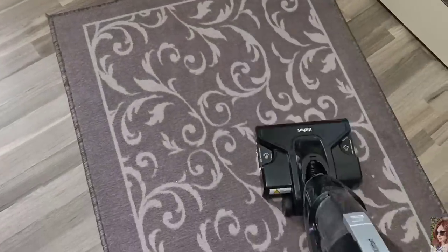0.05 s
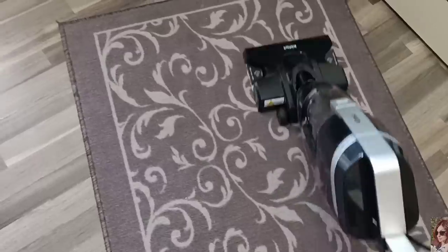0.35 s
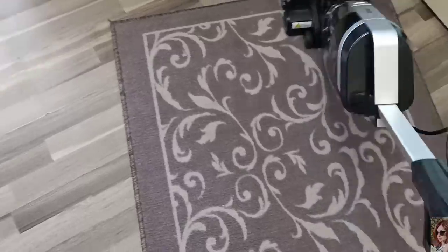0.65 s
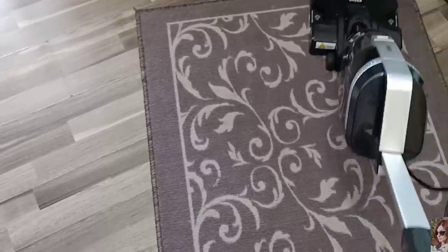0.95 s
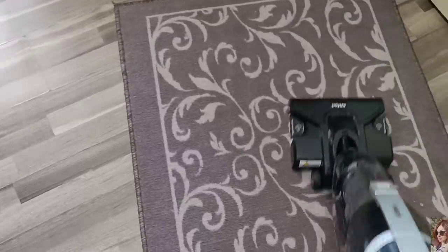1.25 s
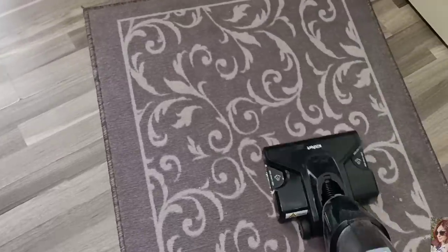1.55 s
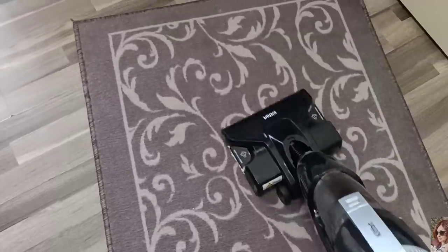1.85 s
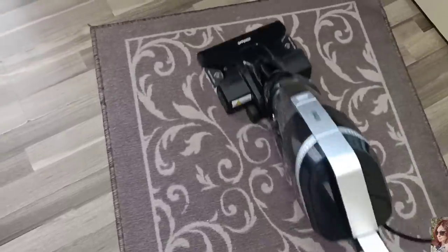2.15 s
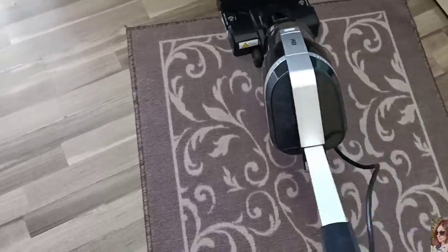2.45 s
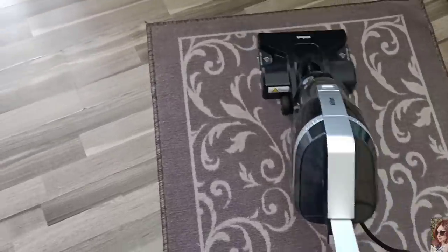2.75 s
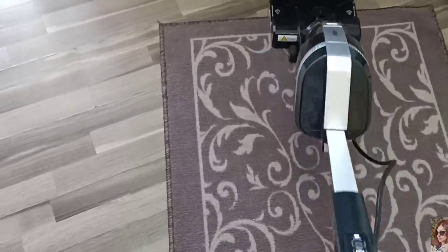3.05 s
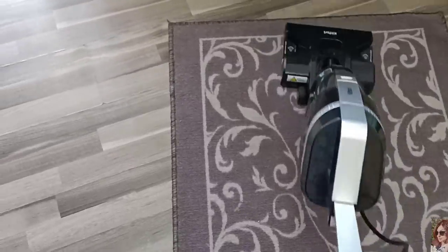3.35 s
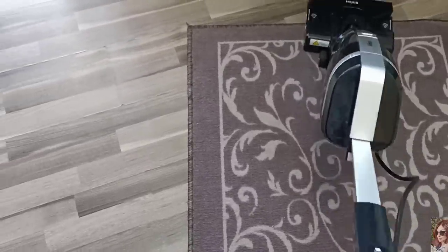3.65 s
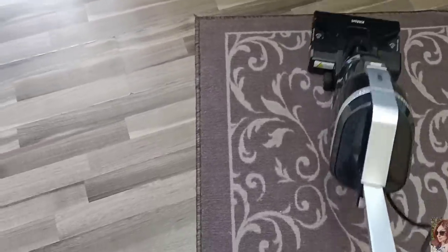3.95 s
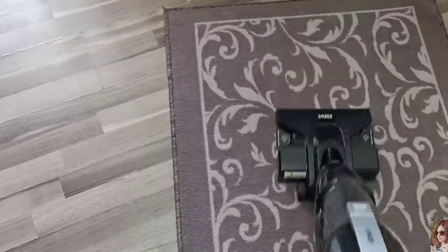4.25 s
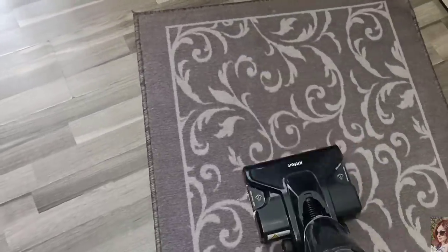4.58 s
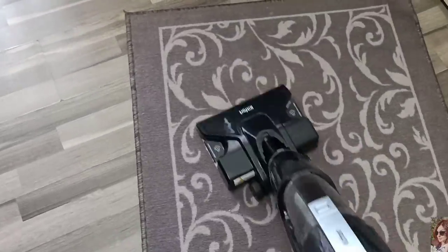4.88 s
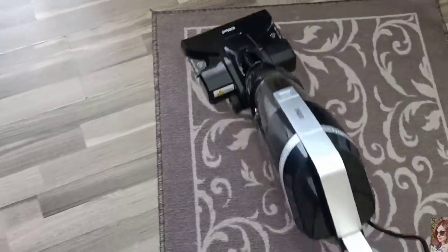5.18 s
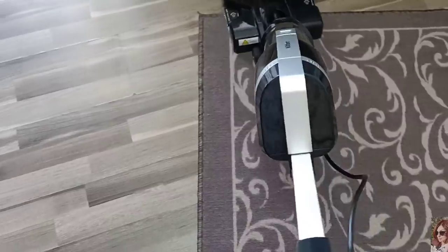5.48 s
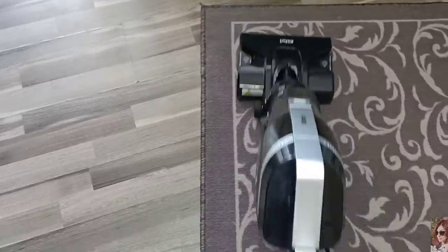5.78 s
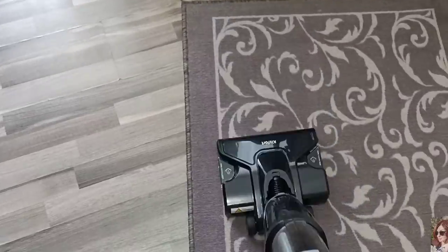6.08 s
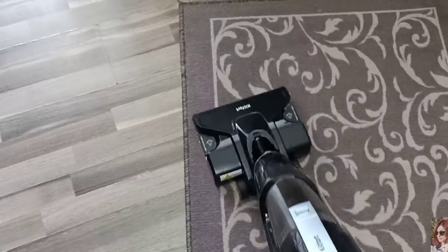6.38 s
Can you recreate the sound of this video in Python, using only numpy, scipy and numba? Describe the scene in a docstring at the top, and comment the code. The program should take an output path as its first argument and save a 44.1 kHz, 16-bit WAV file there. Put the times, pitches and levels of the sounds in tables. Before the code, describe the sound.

An upright vacuum cleaner runs throughout on a rug, with rushing air at the nozzle, a lower roar and a thin hiss. The rush swells and sinks as it is pushed back and forth. Grit whirls in the plastic dust cup with a dense, bright patter, while larger bits click sharply against the wall, hardest about a third of the way in and near the end. A phone microphone picks it up from about a metre away in a furnished room.

```python
"""Furnished room, phone microphone about a metre from an upright vacuum cleaner working a rug; mono.
From the start, air rushes at the nozzle, roars through the ducts and hisses from the vents, while
sucked-up grit whirls round the plastic dust cup in a dense patter. The rush swells and sinks as the
machine is pushed to and fro, with stray ticks of sand and soft thumps of microphone overload. Larger
bits knock on the cup wall, hardest just after 2 s and again from about 5 s; the patter peaks near 6 s."""
import sys
import numpy as np
from scipy import signal
from scipy.fft import rfft, irfft
from scipy.io import wavfile
from scipy.ndimage import uniform_filter1d, minimum_filter1d
from numba import njit

SR = 44100
rng = np.random.default_rng(int(sys.argv[2]) if len(sys.argv) > 2 else 0)


def put_to_file(sound):
    """Save the sound as 16-bit audio at rate SR, in the file named by the first command-line argument."""
    columns = np.atleast_2d(sound).T  # one column per channel
    safe = np.clip(columns, -1, 1)
    whole_steps = np.round(safe * 32767)
    wavfile.write(sys.argv[1], SR, whole_steps.astype(np.int16))


N = 287532
TIME = np.arange(N) / SR

# air rush at the nozzle, loud when drawn near and faint at arm's length: t/s, level/dB
NOZZLE_RUSH = [(0, -23), (0.28, -23.5), (0.55, -25.5), (0.92, -29.5), (1.32, -23.5), (1.6, -25.5),
               (1.85, -23), (2.25, -24.5), (2.5, -28), (2.9, -26), (3.25, -26.5), (3.55, -26),
               (3.95, -26.5), (4.45, -21.5), (4.7, -25), (5.07, -22.5), (5.4, -26.5), (5.8, -28.5),
               (6.27, -21), (6.52, -23)]
# flow of grit whirling in the cup: t/s, level/dB
GRIT_FLOW = [(0, -26.5), (0.3, -23.5), (0.56, -30), (0.7, -25), (0.79, -39), (0.91, -26.5), (1.09, -32),
             (1.2, -24.5), (1.8, -25), (2.06, -29.5), (2.52, -21.5), (2.94, -24.5), (3.18, -21),
             (3.45, -26), (3.97, -28.5), (4.14, -24), (4.26, -32), (4.7, -24.5), (5.04, -33), (5.17, -25),
             (5.36, -30), (5.62, -23.5), (5.97, -18.5), (6.22, -27.5), (6.52, -30)]
USUAL_FLOW_DB = -25.5
# spectrum of grit striking plastic: f/Hz, relative level/dB
GRIT_SPECTRUM = [(25, -18.5), (200, -26.5), (1200, -19), (2000, -12), (2800, -3), (3400, -0.5), (3850, 6),
                 (4400, 3.5), (5150, 2), (5700, 5.5), (6100, -0.5), (6600, -8), (7400, -15), (11000, -39)]
# spectrum of the vent hiss and the sand ticks: f/Hz, relative level/dB
HISS_SPECTRUM = [(1000, -43), (6000, -21), (8000, 4), (9500, 0), (11200, -2.5), (12400, 3.5), (13300, 8),
                 (14300, 7.5), (15700, 0)]


def nozzle(hollow_hz=2904, hz_per_db=16, width_hz=520.0, flutter_db=1.34):
    """Air rushes under the nozzle; its hollow resonance shifts as the gap to the rug changes."""
    # spectrum of the intake air: f/Hz, relative level/dB
    air_spectrum = [(200, -45.5), (1300, -16), (1900, -5.5), (2400, -1), (2900, -2.5), (3600, 2.5),
                    (4300, -2), (5100, -8), (5800, -9), (6800, -20.5), (8500, -31.5), (11000, -37.5),
                    (16000, -29)]
    air = colour(rng.standard_normal(N), air_spectrum)
    rush_db = curve(NOZZLE_RUSH)
    hollow = bandpass(air, hollow_hz + hz_per_db * (rush_db - rush_db.mean()), width_hz)
    return unit(air + hollow) * undb(rush_db + flutter_db * wander(90))


def grit(count=4600, spread_db=2.5, surge_db=0.94, bright_hz=5700.0, brighten=0.23):
    """Hundreds of grains a second, mostly small, strike the cup; a strong flow is louder and brighter."""
    when, weight = rng.random((count, 2)).T
    times = when * N / SR
    sizes = undb(spread_db * np.minimum(-np.log(1 - weight), 4))
    patter = colour(pulses(times, sizes), GRIT_SPECTRUM)
    patter += dust_cup(times, sizes, ring_db=-18, scatter_db=-22.5, scatter_s=0.007)
    flow_db = curve(GRIT_FLOW)
    treble = bandpass(patter, np.full(N, bright_hz), width_hz=1200.0)
    patter += (undb(brighten * (flow_db - USUAL_FLOW_DB)) - 1) * treble
    return unit(patter) * undb(flow_db + 0.1 + surge_db * wander(15))


def hard_bits(count=125, crowding=0.8, lesser_db=-8, crack_hz=4200, hz_per_db=69, spread_hz=350):
    """Time, level and pitch of each hit; in a faster whirl the lesser bits come oftener and harder."""
    # the largest bits hitting the cup wall: t/s, relative level/dB
    largest = [(0.1736, -6.5), (0.2235, -7), (0.5738, -4.5), (0.6518, -4), (1.0112, -6), (1.7357, -6),
               (1.8278, -6), (2.1031, -4), (2.2002, 1), (2.2832, -3), (2.3567, 0), (2.5616, -2),
               (2.5805, -10), (2.7229, -6), (2.7407, -6), (2.8991, -7), (2.9401, -7), (3.0668, -7),
               (3.2061, -12), (3.4497, -7), (3.4983, -5), (3.5279, -14), (3.6833, -7), (3.8396, -7.5),
               (4.3716, -6), (4.8968, -1), (5.0132, -4.5), (5.1824, -3), (5.1932, -1), (5.222, -8),
               (5.2683, -2), (5.4124, -5.5), (5.5332, -1), (5.5921, -7), (5.605, -5), (5.6232, -5),
               (5.635, -1), (5.8127, -3), (5.8809, -6), (6.0179, 0), (6.0667, -2), (6.1296, -2),
               (6.1691, -3), (6.193, -4), (6.3749, -7)]
    flow_db = curve(GRIT_FLOW) - USUAL_FLOW_DB
    passed = np.cumsum(undb(crowding * flow_db))
    shares = (np.arange(count) + 2 * rng.random(count)) % count / count
    times = np.interp(shares, passed / passed[-1], TIME)
    levels = lesser_db + 0.32 * np.interp(times, TIME, flow_db) + rng.standard_normal(count)
    times, levels = np.vstack([np.column_stack([times, levels]), largest]).T
    pitches = crack_hz + hz_per_db * np.interp(times, TIME, flow_db)  # faster whirl, brighter cracks
    return times, levels, pitches + spread_hz * rng.standard_normal(len(times))


def knocks(crack_db=-0.5, rise_s=0.00016, bounce_db=-9, bounce_s=0.004, ring_spread_db=3.0):
    """Each hard bit gives a crack a few cycles long, hops once and sets the cup ringing."""
    times, levels, pitches = hard_bits()
    sizes = undb(levels)
    phases, hops = rng.random((len(times), 2)).T
    t = np.arange(SR // 300) / SR
    envelope = t / rise_s * np.exp(1 - t / rise_s)
    cracks = np.zeros(N + len(t))
    for start, size, hz, phase in zip((times * SR).astype(int), sizes, pitches, phases):
        cracks[start:start + len(t)] += size * envelope * np.cos(2 * np.pi * (hz * t + phase))
    # the cracks sound dulled above about 6.5 kHz
    cracks = signal.sosfilt(signal.butter(6, 6500, fs=SR, output="sos"), cracks[:N])
    bounces = colour(pulses(times + bounce_s * hops, sizes), GRIT_SPECTRUM)
    strikes = sizes * undb(ring_spread_db * rng.standard_normal(len(times)))
    ringing = dust_cup(times, strikes, ring_db=-6.5, scatter_db=-11, scatter_s=0.0018)
    return undb(crack_db) * cracks + undb(bounce_db) * bounces + ringing


def dust_cup(times, sizes, ring_db, scatter_db, scatter_s, travel_s=0.0008):
    """The cup answers each impact with modes weighted by the place struck and a brief dense scatter."""
    # modes of the plastic cup: f/Hz, t60/s, relative level/dB
    cup_modes = [(2774, 0.029, -9), (3380, 0.0041, -11.5), (3750, 0.014, -1), (4034, 0.017, -5.5),
                 (4240, 0.015, -9.5), (4920, 0.021, -5), (5490, 0.012, -3), (5780, 0.013, 0),
                 (6140, 0.0095, -12), (7970, 0.013, -21)]
    places = rng.standard_normal((len(times), len(cup_modes))).T
    places /= np.linalg.norm(places, axis=0)
    # bending waves need a moment to go round the wall, so each mode starts a little late
    lags = travel_s * rng.random((len(times), len(cup_modes))).T
    modes = sum(undb(db) * ring(pulses(times + lag, sizes * place), hz, t60)
                for (hz, t60, db), place, lag in zip(cup_modes, places, lags))
    energy = decay(pulses(times, sizes ** 2), scatter_s / 2)
    scatter = colour(np.sqrt(energy) * rng.standard_normal(N), GRIT_SPECTRUM)
    return undb(ring_db) * modes + undb(scatter_db) * scatter


def exhaust(roar_db=-33.0, duct_db=1.0, vent_db=-45.6):
    """The fan's turbulent air roars, rings the ducts and leaves the vents as a thin, flickering hiss."""
    # resonances of the ducts and motor housing: f/Hz, width/Hz, relative level/dB
    duct_modes = [(287.3, 15.5, 3), (430, 33, -3), (712.4, 27, 4.5), (833, 59, 3), (1131, 38, 2),
                  (1245, 21, 1.5), (2092, 105, 2)]
    # those resonances at the microphone as the body swings and tilts: t/s, level/dB
    duct_facing = [(0, -38), (0.7, -40), (1.1, -37), (1.8, -40.5), (2.05, -40), (2.5, -40), (2.88, -38),
                   (3.15, -40.5), (3.6, -38), (3.85, -39.5), (4.22, -36.5), (4.72, -42), (4.95, -38),
                   (5.8, -39.5), (6.05, -42.5), (6.52, -39)]
    # spectrum of the roar: f/Hz, relative level/dB
    roar_spectrum = [(20, -21), (100, -16.5), (150, -36), (220, -8.5), (350, -0.5), (570, -2.5), (720, 5),
                     (1000, 3.5), (1350, 2), (1900, 7), (3000, -1.5), (6000, -4.5), (10000, -32.5),
                     (16000, -39)]
    # brief swells of the hiss: t/s, half length/s, rise/dB
    hiss_swells = [(1.68, 0.2, 4), (3.82, 0.05, 2), (4.14, 0.045, 5)]
    ducts = sum(undb(db) * width * ring(rng.standard_normal(N), hz, np.log(1000) / (np.pi * width))
                for hz, width, db in duct_modes)
    roar = unit(colour(rng.standard_normal(N), roar_spectrum))
    hiss = unit(colour(rng.standard_normal(N), HISS_SPECTRUM))
    facing_db, rush_db = curve(duct_facing), curve(NOZZLE_RUSH)
    turn_db = facing_db - facing_db.mean()
    roar *= undb(roar_db + 0.12 * (rush_db - rush_db.mean()) + 0.41 * turn_db)
    body = roar + unit(ducts) * undb(facing_db + duct_db)
    swell_db = sum(db * bump(at, half_s) for at, half_s, db in hiss_swells)
    flicker_db = 0.9 * wander(9.2) + 0.84 * wander(48) + 1.9 * wander(550)
    hiss *= undb(vent_db - 0.25 * turn_db + swell_db + flicker_db)  # grows as the ducts turn off-mic
    return body * undb(0.5 * wander(50)) + hiss


def sand_ticks(gain_db=-4, fade_s=0.0025):
    """Sharp sand grains tick in the nozzle, high and very short."""
    # grains striking the nozzle: t/s, relative level/dB
    grains = [(0.4648, -27), (0.7452, -29), (1.0101, -26), (1.4346, -23), (1.8243, -25), (2.2822, -25),
              (2.7212, -31), (4.1415, -27), (4.4194, -27), (4.575, -27), (4.7346, -27), (4.9591, -27),
              (5.2669, -24), (6.128, -27)]
    times, levels = np.transpose(grains)
    envelope = decay(pulses(times, undb(levels + gain_db)), fade_s)
    return envelope * unit(colour(rng.standard_normal(N), HISS_SPECTRUM))


def overload_thumps(gain_db=1, half_s=0.0025, settle_hz=13):
    """Soft low thumps, at listed times, as sharp clicks briefly overload the phone's microphone."""
    # overload thumps: t/s, relative level/dB
    overloads = [(0.225, -40), (1.439, -37), (1.657, -32), (1.738, -36), (1.83, -31), (2.201, -29),
                 (2.553, -37), (4.668, -36), (4.806, -31), (4.962, -33), (5.272, -35), (5.607, -38),
                 (5.816, -36), (6.17, -33)]
    thumps = sum(undb(db + gain_db) * bump(at, half_s) for at, db in overloads)
    return signal.sosfilt(signal.butter(2, settle_hz, "high", fs=SR, output="sos"), -thumps)


def room(x, wet_db, t60, positions=16):
    """Floor and walls return a short tail whose pattern changes as the machine moves."""
    t = TIME[:SR // 3]
    wet = np.zeros(N + len(t))
    edges = np.linspace(0, N, positions + 1).astype(int)
    for start, end in zip(edges, edges[1:]):
        tail = rng.standard_normal(len(t)) * undb(-60 * t / t60) * (t > 0.005)
        wet[start:end + len(t) - 1] += signal.fftconvolve(x[start:end], tail / np.linalg.norm(tail))
    return x + undb(wet_db) * wet[:N]


def undb(db):
    """Decibels to gain."""
    return 10 ** (np.asarray(db) / 20)


def unit(x):
    """Scale to rms 1."""
    return x / np.sqrt(np.mean(x ** 2))


def curve(table):
    """Rows of t/s, value joined by straight lines."""
    return np.interp(TIME, *np.transpose(table))


def bump(at, half_s):
    """A bell curve of height 1 centred on time `at`."""
    return np.exp(-np.minimum(((TIME - at) / half_s) ** 2, 100))


def wander(rate):
    """Random drift of rms 1 through `rate` points a second."""
    knots = rng.standard_normal(size=4000)
    return unit(np.interp(TIME * rate, np.arange(len(knots)), knots))


def pulses(times, sizes):
    """One-sample pushes at the given times."""
    return np.bincount(np.clip(times * SR, 0, N - 1).astype(int), sizes, N)


def decay(x, fade_s):
    """Give each pulse an exponential tail."""
    return signal.lfilter([1], [1, -np.exp(-1 / (fade_s * SR))], x + 1e-18)


def ring(x, hz, t60):
    """A damped mode; a unit pulse starts it at amplitude 1."""
    radius, angle = np.exp(-np.log(1000) / (t60 * SR)), 2 * np.pi * hz / SR
    feedback = [1, -2 * radius * np.cos(angle), radius ** 2]
    return signal.lfilter([0, radius * np.sin(angle)], feedback, x + 1e-18)


def colour(x, spectrum, size=4096):
    """Causal filter through rows of f/Hz, level/dB, built from its cepstrum."""
    hz, db = np.transpose(spectrum)
    grid = np.maximum(np.fft.rfftfreq(size, 1 / SR), 1)
    gains = undb(np.interp(np.log(grid), np.log(hz), db))
    cepstrum = irfft(np.log(gains))
    cepstrum[1:size // 2] *= 2
    cepstrum[size // 2 + 1:] = 0
    return signal.oaconvolve(x, irfft(np.exp(rfft(cepstrum))))[:N]


@njit
def bandpass(x, hz, width_hz):
    """Band-pass with a moving centre and gain 1 there."""
    y, band, low = np.empty(len(x)), 0., 0.
    for i in range(len(x)):
        g, damping = np.tan(np.pi * hz[i] / SR), width_hz / hz[i]
        v = (band + g * (x[i] - low)) / (1 + g * (g + damping))
        band, low = 2 * v - band, low + 2 * g * v
        y[i] = damping * v
    return y


def scene():
    """Continuous air, the rattle with its room tail, and the phone's own thumps."""
    air = exhaust() + nozzle()
    rattle = grit() + knocks() + sand_ticks()
    return (air + room(rattle, wet_db=-10.5, t60=0.39) + overload_thumps())[None]


def record(dry, ceiling=0.72, window_samples=45, top_hz=15750):
    """The phone's limiter briefly ducks the highest peaks, and the top is cut."""
    needed = ceiling / np.maximum(np.abs(dry), ceiling)
    gain = uniform_filter1d(minimum_filter1d(needed, window_samples), window_samples)
    return signal.sosfilt(signal.ellip(14, 0.1, 75, top_hz, fs=SR, output="sos"), gain * dry)


dry = scene()
out = record(dry)
put_to_file(out)
```